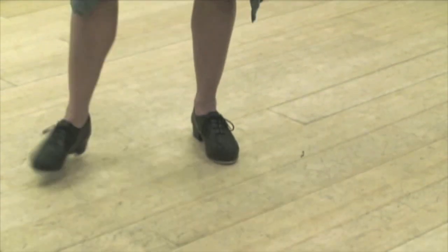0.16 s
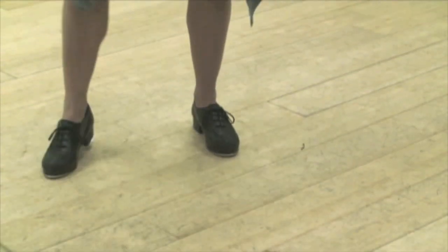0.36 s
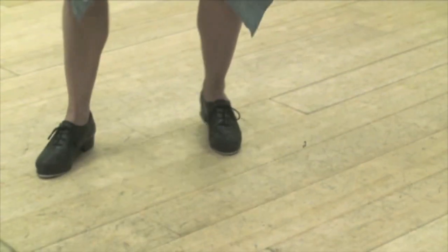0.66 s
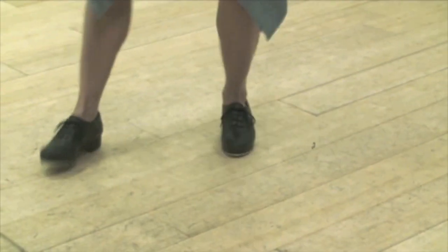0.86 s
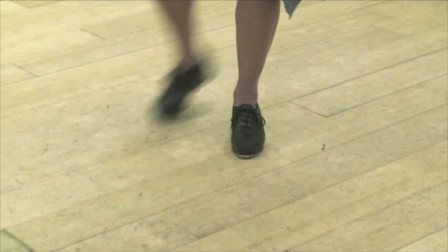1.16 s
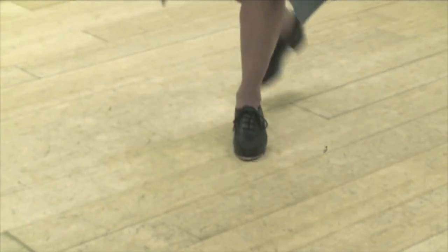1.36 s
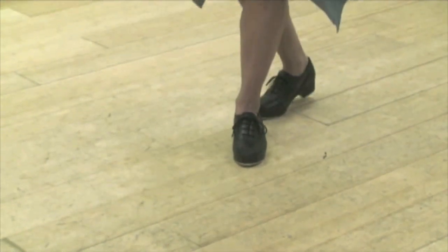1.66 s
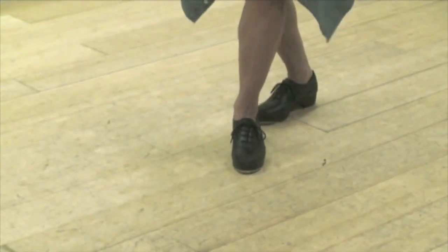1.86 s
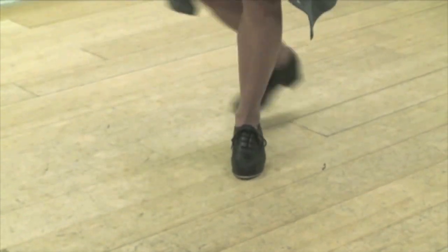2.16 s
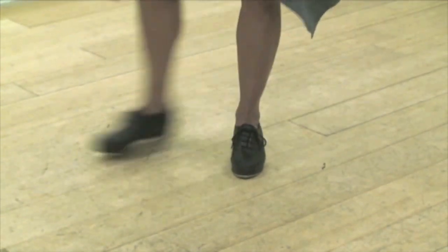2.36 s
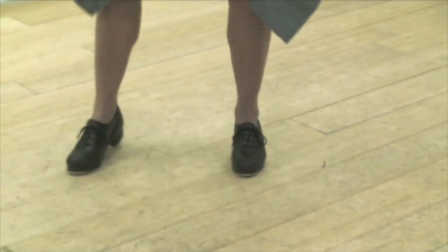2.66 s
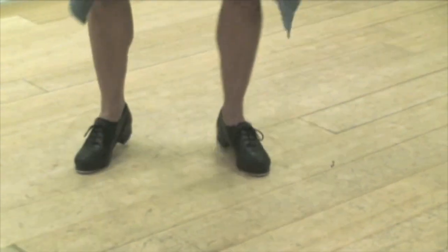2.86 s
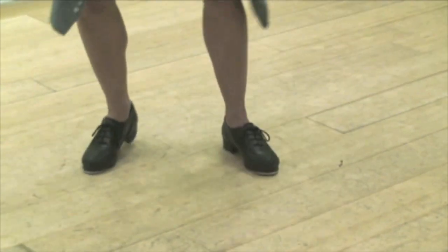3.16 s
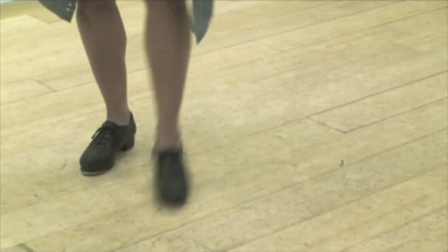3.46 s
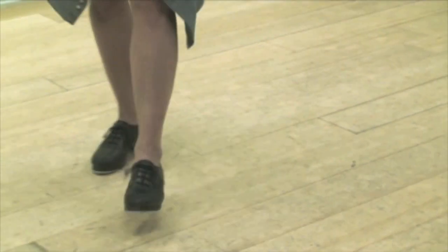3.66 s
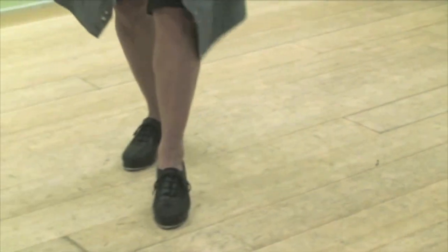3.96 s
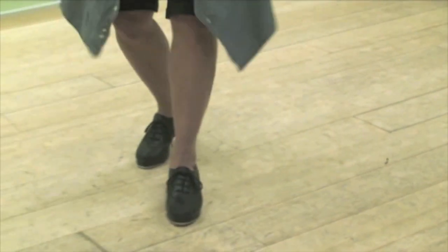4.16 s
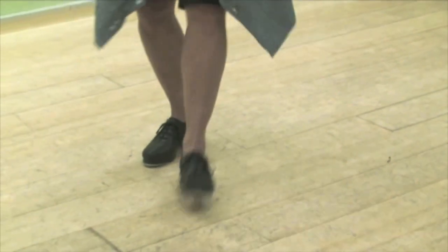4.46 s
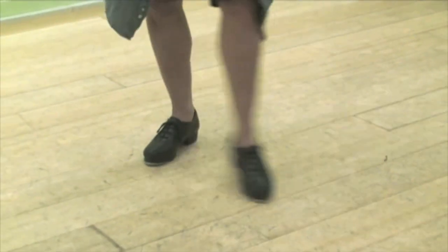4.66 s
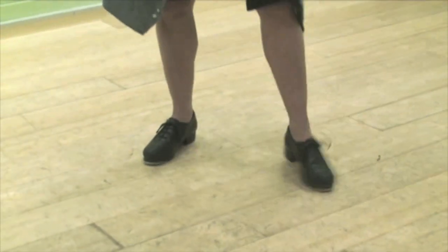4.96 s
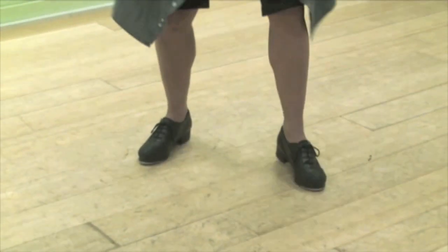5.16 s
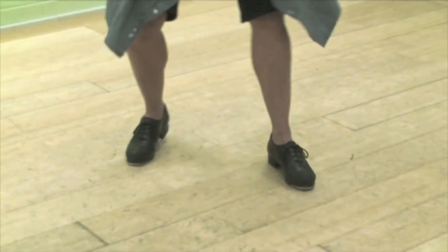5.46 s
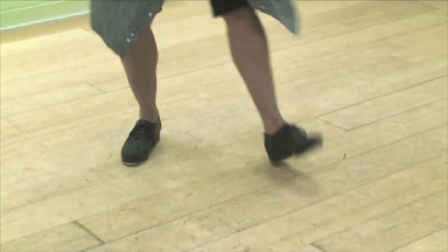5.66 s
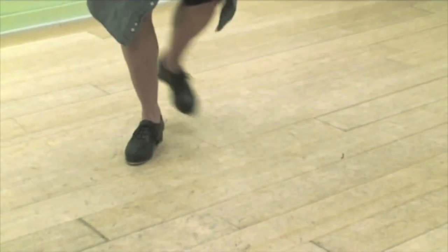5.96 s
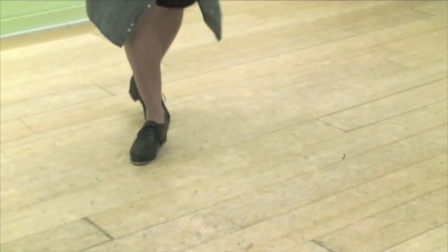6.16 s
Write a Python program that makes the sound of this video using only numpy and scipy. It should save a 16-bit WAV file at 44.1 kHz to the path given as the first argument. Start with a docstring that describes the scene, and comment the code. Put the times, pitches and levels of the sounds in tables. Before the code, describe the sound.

A bare, echoing dance studio with steady low ventilation rumble and a faint fan hum. The tail of a heel drop is fading as the first bright metal toe slap lands at 0.04 seconds, another at 0.36, then two woody heel knocks at 0.66 and 0.96, the second heavier, with a deep floor thump. A dull little bump touches the microphone at 1.15. The same four-blow pattern continues evenly, about 0.3 seconds apart: slaps at 1.27 and 1.58, heels at 1.88 and 2.17; slaps at 2.47 and 2.77, heels at 3.05 and 3.36; slaps at 3.65 and 3.96, heels at 4.25 and 4.55; slaps at 4.85, especially loud, and 5.16, heels at 5.44 and 5.72. A lighter toe tap follows at 6.02 and rings away. Slaps are flat, hard and slightly overloaded up close; each blow leaves a diffuse ring under a second long.

```python
"""First the tail of a heel drop rings out in a bare, echoing studio; then a tap dancer goes on over the sprung
wooden floor: two bright toe slaps, two heavier heel drops, over and over. Each blow is shaped noise: a crack of
metal plate on boards and a ringing hall. The heels also pump a deep pulse, the thump, out of the floor.
A small stereo camera stands close by: the slaps overload its two microphone ports, and decaying sines and a
noise tick make one bump against it. Ventilation, steady noise with a low fan tone, rumbles underneath."""
import sys
import numpy as np
from scipy import signal
from scipy.fft import rfft, irfft
from scipy.io import wavfile
from scipy.ndimage import map_coordinates

SR = 44100
rng = np.random.default_rng(int(sys.argv[2]) if len(sys.argv) > 2 else 0)


def unload_wav(signal):
    """Save mono or channel-first audio to the path in sys.argv[1] as 16-bit WAV at rate SR, clipped to [-1, 1]."""
    wavfile.write(
        sys.argv[1],
        SR,
        np.round(np.clip(np.atleast_2d(signal).T, -1, 1) * 32767).astype(np.int16),
    )


N = 278271  # samples

# ventilation spectrum: hz, level_db (per kHz)
VENT = [(20, -30.5), (45, -26.5), (70, -37.5), (110, -33.5), (250, -39.5), (600, -52), (1500, -56),
        (4000, -64.5), (10000, -75), (15000, -77)]
# dry bump at the camera: start_s, level_db
BUMP = (1.1505, -1)
# what the bump rings with: hz, level_db (before the bump's own level), t60_s
BUMP_MODES = [(72, -13, 0.033), (255, -14, 0.0069), (644, 11, 0.0022), (2820, -1, 0.003)]
# decay of the hall, scaled for each kind of blow: hz, t60_s (before scaling)
HALL_DECAY = [(100, 0.61), (300, 0.81), (1000, 0.81), (2500, 0.71), (6000, 0.75), (12000, 0.48)]
# what all blows share, a weak bass and a soft top: hz, gain_db
RADIATION = [(40, -14), (90, -11), (130, -3.5), (160, -7.5), (220, 0), (245, 2.5), (450, 1), (800, -1.5),
             (2600, 1), (3700, -0.5), (11000, 1), (13800, -3.5), (15200, -42)]
# resonances of the boards: hz, width_hz, height_db
BOARDS = [(252, 15, 0), (280.7, 4.7, 7.5), (437, 35, 1.5)]
# the thump and its returns from ceiling and walls: delay_s, height (share)
THUMP_PATHS = [(.003, 0.14), (.031, 0.76), (.049, 0.61), (0.08, 0.97), (0.108, 0.25), (.127, .2),
               (.152, 0.42), (0.18, 0.13)]
# heel drops: start_s, level_db (per kHz, before crack and hall gains), weight_db (on the boards),
# bright_db_per_octave, clack_db (main modes of the plate), ring_hz and ring_db (modes favoured by the
# spot that lands, and their lift), crack_db (gain of the direct crack), thump_db
HEELS = [(-.2, -31, 6, 2, 0, 2830, 4.2, 8, -20), (0.6592, -37, 7, 4, -.3, 3750, 8.1, 9.5, -24.5),
         (0.9551, -26.5, 5.5, 4.5, -8.5, 2820, 14.6, 1.5, -16.5),
         (1.8797, -35, 4.5, 2.8, 1.5, 5600, 8, 5.6, -28),
         (2.169, -25.5, 3.5, 0.3, 5.5, 1970, 1.3, 6.3, -17),
         (3.0549, -33.5, -0.5, 2.5, 3.5, 3540, 11.6, 11.3, -23),
         (3.3617, -24, -4, -1, -5.5, 3000, 1.4, 7.7, -17.5),
         (4.253, -34, 6, 4.5, 1, 3780, 11.8, 10.3, -20.5),
         (4.5504, -30.5, .3, -1.4, -2, 9700, 4.5, 9.1, -24),
         (5.4448, -31, 2, -1.5, 2, 3700, 6.5, 10.7, -29),
         (5.7207, -25.5, -5, -1.4, -9, 2829, 3.7, 6.7, -21.5)]
# colour of a heel drop, a woody knock: hz, gain_db
HEEL_COLOUR = [(400, 0), (830, 2.7), (1400, 5), (2400, -8.5), (4600, -12.5), (10000, -13.5)]
# clusters of modes of the heel plate, the main one first: hz, height_db
HEEL_PLATE = [(2500, 6.5), (5600, 0), (7000, 1.5), (10200, 3)]
# toe slaps: start_s, level_db (per kHz, before crack and hall gains), weight_db, bright_db_per_octave,
# clack_db, ring_hz, ring_db (as for the heels)
TOES = [(0.0364, -15, 3, 1.5, 5.4, 1610, 6), (0.3562, -12, 1.5, 0.5, 0.5, 1773, 2.2),
        (1.2721, -14, -1.1, 1.5, 2.3, 6300, 4.5), (1.5794, -12, -3, -1.5, -3, 4690, 5.5),
        (2.4672, -13, -1, -0.3, 1.3, 4112, 5), (2.7744, -9.5, -2, -0.5, 0.5, 9539, 2),
        (3.6511, -12.5, 0.7, -0.05, .1, 10200, 2.5), (3.963, -9.5, 1.4, -0.1, -4, 3658, 1.5),
        (4.851, -6.5, -4.5, -4.5, -3.5, 10900, 8.5), (5.163, -12, 5.5, 0.4, -3, 3658, 4),
        (6.024, -22.5, 5.5, 2.5, 2.5, 6500, 7)]
# colour of a toe slap, a hard clack: hz, gain_db
TOE_COLOUR = [(400, 1), (830, -3.5), (1400, -5.5), (2400, -1.5), (3400, -7.5), (4600, -12), (10000, -16.5)]
# clusters of modes of the toe plate, the main one first: hz, height_db
TOE_PLATE = [(2400, 0.3), (6600, 1.5), (10200, 2.5)]

LENGTH = 2 ** 16  # samples in one blow or bump
AGE = np.arange(LENGTH) / SR  # seconds since its start
HZ = np.maximum(np.arange(LENGTH // 2 + 1) * SR / LENGTH, 1)
HUM_HZ, HUM_DB = 58.5, -44  # fan tone
WEIGHT_BELOW_HZ = 770  # the dancer's weight drives the boards below this
BRIGHT_ABOVE_HZ = 2230  # a harder contact tilts the spectrum up above this
USUAL_SLAP_DB = -12  # level of an ordinary slap, per kHz
SLAP_CRACK_DB = -2.5  # gain of its direct crack
CRACK_GAIN_DB_PER_DB = 0.57  # the lighter the slap, the more its crack stands out
WALL_ECHO_S, WALL_ECHO_DB = 0.0127, -8.5  # the nearest wall returns each crack once
PORT_LAG_SAMPLES = 1.11  # left microphone port behind the right
CEILING = 0.47  # overload level, as a share of full scale
MONO_BELOW_HZ, CUTOFF_HZ = 6500, 16000


def from_db(db):
    """Decibels to gain."""
    return 10 ** (np.asarray(db) / 20)


def at_hz(points, hz):
    """Read a table on a log-frequency axis."""
    f, value = np.transpose(points)
    return np.interp(np.log(hz), np.log(f), value)


def dying(t60):
    """An exponential decay by 60 dB in t60 seconds."""
    return 1000.0 ** (-AGE / t60)


def hump(hz, width_hz):
    """The shape of one resonance, 1 on top."""
    return 1 / (1 + (2 * (HZ - hz) / width_hz) ** 2)


def cluster(hz, width_hz):
    """Several close modes merge into a flat-topped hill, 1 on top."""
    return 1 / (1 + (2 * (HZ - hz) / width_hz) ** 4)


def add(track, sound, s):
    """Mix a sound in at a time in seconds; of one that starts before zero only the tail is heard."""
    at = int(s * SR)
    part = sound[..., max(-at, 0):N - at]
    start = max(at, 0)
    track[..., start:start + part.shape[-1]] += part


def port_noise(hz, size, apart_hz=9500):
    """Spectra of diffuse noise at two close ports, 0 dB per kHz: alike in the bass, less so in the treble."""
    mid, side = rfft(rng.standard_normal((2, size))) * np.sqrt(SR / 2000)
    alike = 1 / (1 + (hz / apart_hz) ** 2)
    common = np.sqrt((1 + alike) / 2) * mid
    difference = np.sqrt((1 - alike) / 2) * side
    return common + difference * [[1], [-1]]


def ventilation():
    """A steady rumble of diffuse air noise with a low fan tone."""
    hz = np.maximum(np.arange(N // 2 + 1) * SR / N, 1)
    air = irfft(port_noise(hz, N) * from_db(at_hz(VENT, hz)), N)
    fan_tone = np.sqrt(2) * np.sin(2 * np.pi * HUM_HZ * np.arange(N) / SR)
    return air + from_db(HUM_DB) * fan_tone


def bump(tick_db=-19, tick_t60=0.015):
    """One dull knock on the camera with a small tick, too near for the hall to answer."""
    out = np.zeros(N)
    start_s, level_db = BUMP
    knock = 0
    for hz, db, t60 in BUMP_MODES:
        knock = knock + from_db(db) * np.sin(2 * np.pi * hz * AGE) * dying(t60)
    tick = from_db(tick_db) * rng.standard_normal(LENGTH) * dying(tick_t60)
    add(out, from_db(level_db) * (tick - knock), start_s)
    return out


def hall(colour, build_s, early_share, decay_scale, clatter_db=3.5, cluster_s=0.002, blur_s=0.074):
    """Reflections arrive in clusters, thicken into a smooth wash and die away band by band, the top fastest."""
    field = port_noise(HZ, LENGTH, apart_hz=14000) * colour
    centres, t60s = np.transpose(HALL_DECAY)
    tail = 0
    for pick, t60 in zip(np.eye(len(HALL_DECAY)), t60s):
        band = np.interp(np.log(HZ), np.log(centres), pick)  # overlapping triangles that sum to 1
        tail = tail + irfft(field * band) * dying(t60 * decay_scale)
    thickening = 1 - (1 - early_share) * np.exp(-(AGE / build_s) ** 2)
    knots = np.arange(1024)
    clusters = np.interp(AGE / cluster_s, knots, rng.standard_normal(len(knots)))
    clatter = from_db(clatter_db * clusters * np.exp(-AGE / blur_s))
    return tail * thickening * clatter


def fine_modes(depth_db, spacing_hz, from_hz):
    """The plate's many lesser modes, new strengths for every blow: a ripple in dB, deepest in the treble."""
    knots = np.arange(512)
    ripple = np.interp(HZ / spacing_hz, knots, rng.standard_normal(len(knots)))
    return depth_db * ripple * HZ / (HZ + from_hz)


def blow_colour(colour, plate, level_db, weight_db, bright_db_per_octave, clack_db, ring_hz, ring_db):
    """Spectrum of a blow: weight swells the boards, hardness tilts the treble, plate modes add hills."""
    db = level_db + at_hz(colour, HZ) + at_hz(RADIATION, HZ)
    db = db + weight_db / (1 + (HZ / WEIGHT_BELOW_HZ) ** 4)
    db = db + bright_db_per_octave * np.log2(np.hypot(1, HZ / BRIGHT_ABOVE_HZ))
    for hz, width, height in BOARDS:
        db = db + height * hump(hz, width)
    main_hz = plate[0][0]
    # a free plate clacks at its main modes; the spot that lands favours others
    for hz, height in [*plate, (main_hz, clack_db), (ring_hz, ring_db)]:
        width = 680 * np.cbrt(hz / 1000)
        db = db + height * cluster(hz, width)
    return from_db(db + fine_modes(depth_db=5.5, spacing_hz=74.28, from_hz=4500))


def crack(colour, contact_s, ring_db, ring_t60, dull_hz):
    """Direct sound: the plate chatters on wood for a few ms, then rings briefly; its treble is beamed aside."""
    chatter = np.exp(-(AGE / contact_s) ** 4) + from_db(ring_db) * dying(ring_t60)
    spectrum = port_noise(HZ, LENGTH, apart_hz=20000) * colour / np.hypot(1, HZ / dull_hz)
    return irfft(spectrum) * chatter


def floor_thump(width_s=0.0052, rumble_db=-15, rumble_t60=1.0):
    """The floor dips and springs back; the air pulse returns from ceiling and walls and blurs into a rumble."""
    pulses = 0
    for delay, height in THUMP_PATHS:
        u = ((AGE - delay) / width_s) ** 2
        pulses = pulses + height * (1 - u) * np.exp(-u / 2)
    low_band = signal.butter(2, [22, 75], "band", fs=SR, output="sos")
    rumble = signal.sosfilt(low_band, rng.standard_normal(LENGTH))
    swell = dying(rumble_t60) * (1 - dying(0.033))
    return pulses + from_db(rumble_db) * rumble / rumble.std() * swell


def heels(hall_db=0.7):
    """Short, hard clicks with the dancer's weight behind them: crack, hall, floor thump and a wall echo."""
    out = np.zeros((2, N))
    for s, level_db, *touch, crack_db, thump_db in HEELS:
        colour = blow_colour(HEEL_COLOUR, HEEL_PLATE, level_db, *touch)
        direct = crack(colour, contact_s=0.0039, ring_db=-10.0, ring_t60=0.049, dull_hz=4900)
        echo = hall(colour, build_s=0.014, early_share=0.21, decay_scale=0.89)
        thump = from_db(thump_db) * floor_thump()
        add(out, from_db(crack_db) * direct + from_db(hall_db) * echo + thump, s)
        add(out, from_db(crack_db + WALL_ECHO_DB) * direct, s + WALL_ECHO_S)
    return out


def toes(hall_db=1.0):
    """Flat slaps of the big front plates: crack, hall and a wall echo."""
    out = np.zeros((2, N))
    for s, level_db, *touch in TOES:
        colour = blow_colour(TOE_COLOUR, TOE_PLATE, level_db, *touch)
        crack_db = SLAP_CRACK_DB + CRACK_GAIN_DB_PER_DB * (USUAL_SLAP_DB - level_db)
        direct = crack(colour, contact_s=0.0051, ring_db=-27, ring_t60=0.1, dull_hz=6600)
        echo = hall(colour, build_s=0.031, early_share=0.31, decay_scale=0.94)
        add(out, from_db(crack_db) * direct + from_db(hall_db) * echo, s)
        add(out, from_db(crack_db + WALL_ECHO_DB) * direct, s + WALL_ECHO_S)
    return out


def scene():
    """The sound at the two microphone ports; it reaches the left one a moment later."""
    left, right = ventilation() + bump() + heels() + toes()
    left = map_coordinates(left, [np.arange(N) - PORT_LAG_SAMPLES], order=3, mode="nearest")
    return np.array([left, right])


def record(dry):
    """Overload flattens the slaps; stereo width fades out below the treble; the top is cut."""
    left, right = dry / (1 + (dry / CEILING) ** 6) ** (1 / 6)
    hz = np.arange(N // 2 + 1) * SR / N
    width = hz ** 2 / np.hypot(hz ** 2, MONO_BELOW_HZ ** 2)
    side = irfft(rfft(left - right) / 2 * width, N)
    stereo = (left + right) / 2 + side * [[1], [-1]]
    top_cut = signal.cheby2(14, 60, CUTOFF_HZ, fs=SR, output="sos")
    return signal.sosfilt(top_cut, stereo)


dry = scene()
out = record(dry)
unload_wav(out)
```